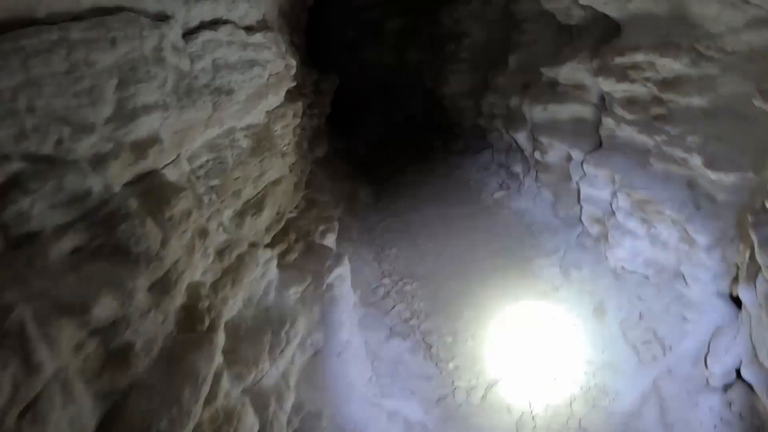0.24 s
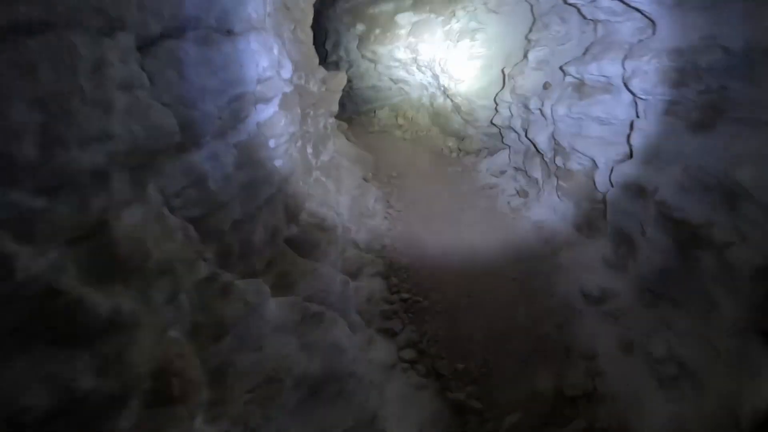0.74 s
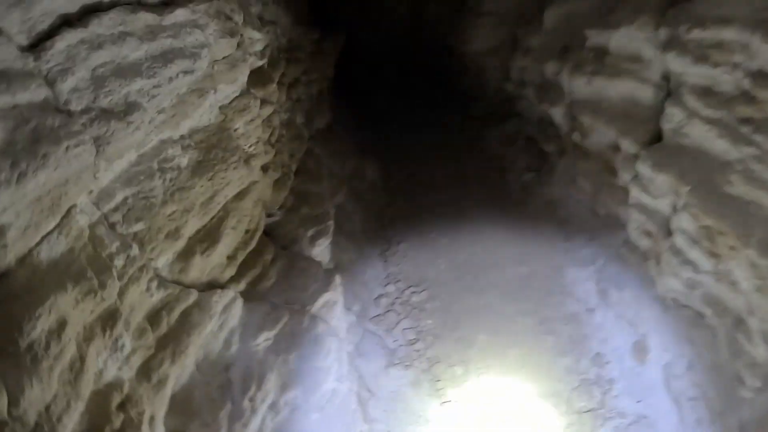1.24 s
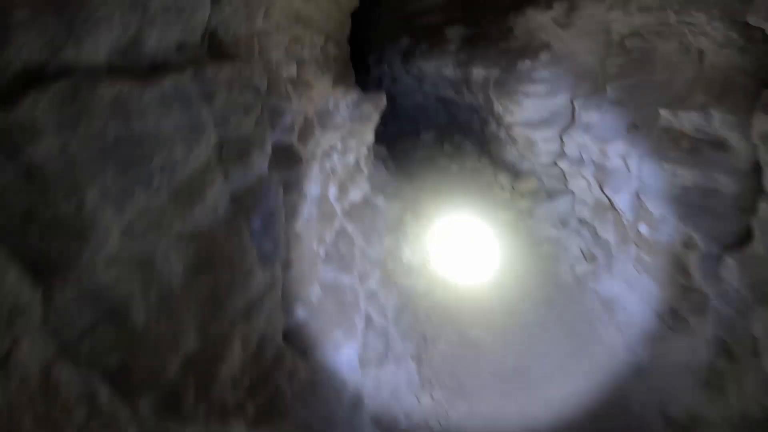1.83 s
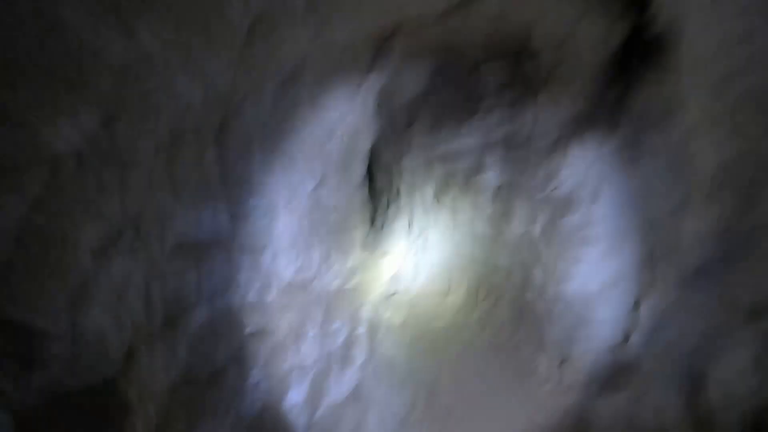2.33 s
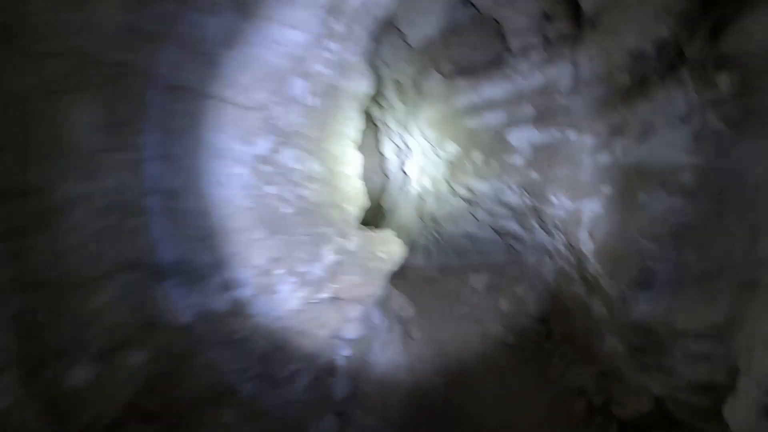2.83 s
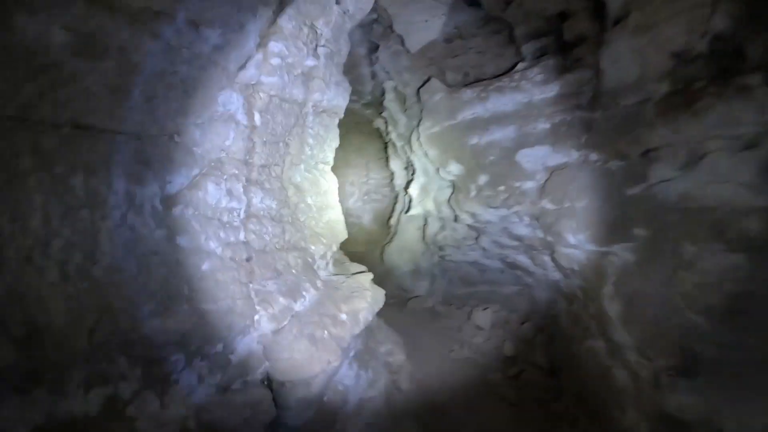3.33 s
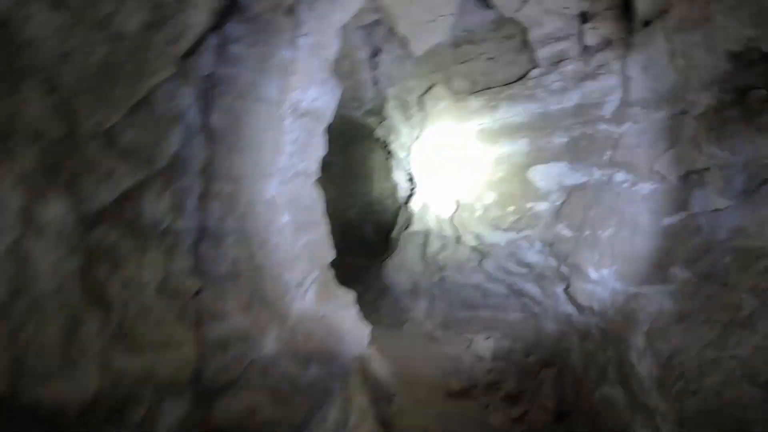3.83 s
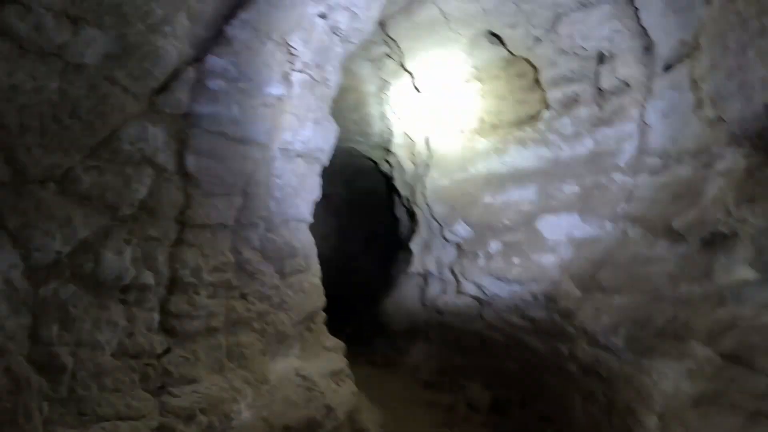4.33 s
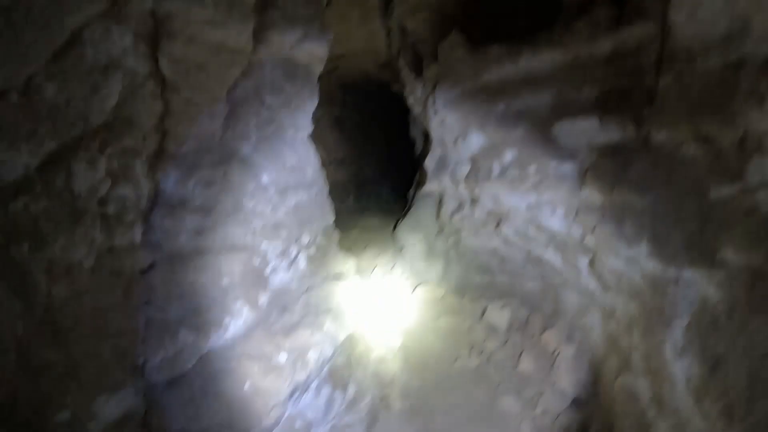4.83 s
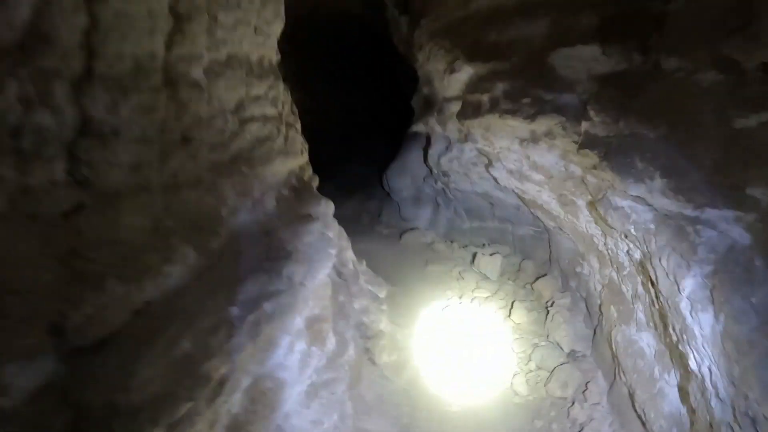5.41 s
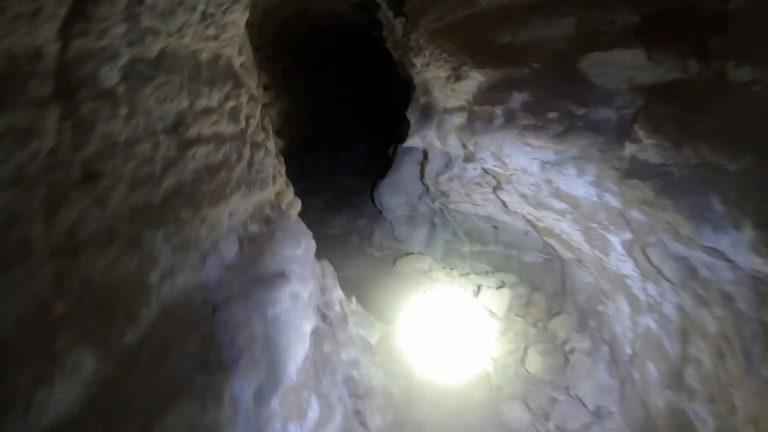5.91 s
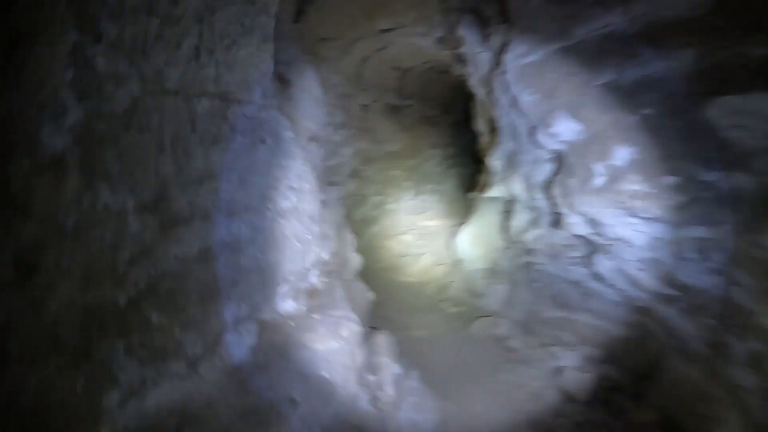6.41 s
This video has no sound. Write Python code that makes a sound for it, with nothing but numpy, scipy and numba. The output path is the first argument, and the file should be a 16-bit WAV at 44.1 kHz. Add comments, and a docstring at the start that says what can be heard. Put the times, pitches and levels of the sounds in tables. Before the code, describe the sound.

A faint steady hiss and unsteady low rumble lie under boots moving over loose stones in a cave passage, heard from a carried stereo microphone. A sharp stone crack with crunching gravel comes within 0.1 s. Short crunches and knocks follow near 0.65, 0.9 and 1.06 s, with softer scuffs around 1.5 to 1.7 s. After a light handling bump at 2.1 s, the heaviest treads hit from 2.3 to 2.7 s: stones crack and clatter, bright chips tick, dull thumps knock the microphone, and the passage booms in low, hollow notes. A strong gritty scuff comes at 3.1 s, with pebbles shifting until 3.4 s. Smaller knocks follow at 3.8 and 4.4 s, the latter with a thump, and a soft bump at 4.8 s. Sparse, lighter crunches return around 5.0, 5.7 and 6.3 to 6.5 s, with small ticks. The walls give a short, dull echo.

```python
"""A faint hiss, a low rumble and quiet crunches open the scene; boots step over loose stones in a rock passage.
A sharp crack comes within 0.1 s and crunches follow until 1.7 s, heard by a camera carried along.
From 2.1 to 2.7 s the steps are heaviest: stones crack, chips tick, bumps thump and the passage booms.
A strong scuff follows at 3.1 s, then mostly lighter steps until 6.5 s. Each knock, crack, chip, bump and boom
is made of fading rings; hiss and rumble are filtered noise, and the walls answer the stones with a short echo."""
import sys
import numpy as np
from scipy import signal
from scipy.fft import rfft, irfft, next_fast_len
from scipy.io import wavfile
from scipy.ndimage import uniform_filter1d
from numba import njit

SR = 44100
rng = np.random.default_rng(int(sys.argv[2]) if len(sys.argv) > 2 else 0)


def put_to_file(sound):
    """Save the sound as 16-bit audio at rate SR, in the file named by the first command-line argument."""
    columns = np.atleast_2d(sound).T  # one column per channel
    safe = np.clip(columns, -1, 1)
    whole_steps = np.round(safe * 32767)
    wavfile.write(sys.argv[1], SR, whole_steps.astype(np.int16))


N = 294147
SIDES = np.array([[1], [-1]])  # left, right


def undb(db):
    """Turn decibels into a plain loudness factor."""
    return 10 ** (np.asarray(db) / 20)


def unit(x):
    """Scale a sound to an average (RMS) level of 1."""
    return x / np.sqrt(np.mean(x ** 2))


def colour(x, points):
    """Make some pitches louder and others softer, along a curve of (f/Hz, level/dB) points."""
    hz, db = np.transpose(points)
    size = next_fast_len(N)
    bin_hz = np.arange(size // 2 + 1) * SR / size
    # the + 1 avoids the logarithm of zero
    gain = undb(np.interp(np.log(bin_hz + 1), np.log(hz), db))
    return irfft(rfft(x, size) * gain, size)[..., :N]


@njit
def knocks(length, start, pole, size):
    """Add up fading rings, each starting at its own sample."""
    out = np.zeros(length)
    for k in range(len(start)):
        z, i = 1 + 0j, start[k]
        # a ring stops once it has faded by 60 dB
        while abs(z) > 1e-3 and i < length:
            out[i] += size[k] * z.imag
            z *= pole[k]
            i += 1
    return out


def ring(s, hz, t60, size):
    """Struck things ring: a sine starts at each time s and fades by 60 dB in t60 seconds."""
    turn = 2j * np.pi * np.clip(hz, 20, SR / 2.2) / SR
    fade = np.log(1000) / (np.maximum(t60, 1e-4) * SR)
    return knocks(N, (s * SR).astype(np.int64), np.exp(turn - fade), size)


def walk(rate):
    """Wander at random: about `rate` new values a second, smoothed; spread near 1."""
    k = int(SR / rate)
    steps = np.repeat(rng.standard_normal(N // k + 1), k)
    return 1.3 * uniform_filter1d(uniform_filter1d(steps, k), k)[:N]


# tone of the hiss, only the shape counts: (f/Hz, level/dB)
HISS_TONE = [(59, -36), (100, -6), (257, 1), (375, -7), (831, -14), (1090, -6), (1290, -5), (1660, -12),
             (2230, -16), (3610, -21), (4350, -20), (7510, -23), (9860, -33), (11200, -40), (15000, -49)]


def hiss():
    """A faint hiss whose level wanders a little: coloured noise, partly different left and right."""
    mid, side = colour(rng.standard_normal((2, N)), HISS_TONE)
    level_db = -69.5 + 1.5 * walk(3)
    return unit(mid + .5 * side * SIDES) * undb(level_db)


# how loud the rumble is over time: (t/s, level/dB)
RUMBLE_LEVEL = [(0.0, -45.5), (0.28, -37), (0.41, -50), (0.67, -36.5), (0.82, -47.5), (0.98, -38.5),
                (1.1, -44), (1.7, -48), (1.84, -38), (2.07, -39.5), (2.17, -27), (2.24, -34.5), (2.43, -25),
                (2.7, -31.5), (3.1, -47), (3.3, -39), (3.7, -48.5), (4.03, -38), (4.14, -51), (4.4, -45),
                (4.46, -30), (4.53, -48.5), (4.77, -39.5), (5.05, -47.5), (5.7, -42.5), (6.67, -44)]


def rumble():
    """Air and handling move the microphones' skins slowly, almost alike left and right."""
    low = signal.butter(5, 51.9, fs=SR, output="sos")  # keeps what lies below 51.9 Hz
    tone = [(6, -12.5), (18, 7.5), (30, -6.5), (45, -7.0), (70, -9.5)]  # (f/Hz, level/dB)
    mid, side = signal.sosfilt(low, colour(rng.standard_normal((2, N)), tone))
    s, db = np.transpose(RUMBLE_LEVEL)
    level_db = np.interp(np.arange(N) / SR, s, db)
    return unit(mid + .24 * side * SIDES) * undb(level_db)


# the two low notes of the passage: (f/Hz, time to fade by 60 dB/s)
PASSAGE_NOTES = [(118, 0.8), (164, 0.6)]
# blows that set them ringing, levels before the band filter:
# (t/s, low note level/dB, upper note against it/dB)
BOOM_BLOWS = [(0.084, -58, 14), (0.699, -47, 2), (1.525, -67, 20), (1.816, -63, 11), (2.297, -27.5, 0),
              (2.348, -26, 8), (2.399, -19.5, -11), (2.625, -30, -3.5), (3.171, -45, -20),
              (3.789, -48.5, 2), (4.443, -61, -3), (6.389, -66, 14.5)]


def booms():
    """Heavy blows set the air of the passage ringing in two low notes, which build up slowly."""
    s, low_db, upper_db = np.transpose(BOOM_BLOWS)
    air = 0
    for (hz, t60), db in zip(PASSAGE_NOTES, (low_db, low_db + upper_db)):
        air = air + ring(s, hz + 0 * s, t60 + 0 * s, undb(db))
    # the band filter, 95 to 200 Hz, softens the start of each ring
    return signal.sosfilt(signal.butter(2, [95, 200], "band", fs=SR, output="sos"), air)


# bumps on the camera, levels before fading and smoothing:
# (t/s, level/dB, push length/s, tick against the push/dB)
CAMERA_BUMPS = [(0.086, -44.5, 0.0104, 27.5), (0.63, -30.5, 0.0064, -15), (0.897, -33, 0.0062, -0.5),
                (1.244, -41, 0.0039, -3), (2.131, -30, 0.0041, -13), (2.165, -20, 0.003, -16),
                (2.238, -25, 0.01, -3), (2.301, -12.5, 0.0076, -17), (2.346, -22, 0.012, -6),
                (2.382, -14, 0.011, -17.5), (2.399, -13, 0.0097, -6), (2.436, -15, 0.011, -12),
                (2.494, -10.5, 0.009, -23.5), (2.541, -23, 0.009, -8), (2.624, -23.5, 0.0073, 5),
                (3.124, -49, 0.01, 5), (3.164, -30.5, 0.015, 6), (3.783, -32.5, 0.013, 1),
                (4.405, -44, 0.012, -7), (4.447, -21, 0.0047, -9), (4.768, -29.5, 0.011, -32),
                (4.789, -36, 0.009, -27)]


def bumps():
    """A soft push on the camera body is a low, short ring; its shell adds a short tick."""
    s, db, push, tick_db = np.transpose(CAMERA_BUMPS)
    # one push is half a swing
    body = ring(s, 1 / (2 * np.maximum(push, .002)), 6.3 * push, undb(db))
    tick = ring(s, 420 + 0 * s, 0.0056 + 0 * s, undb(db + tick_db))
    return body + uniform_filter1d(tick, size=24)


def walls(x):
    """Rough rock scatters the sound into a short, duller tail, its treble different at each ear."""
    t60_s, echo_db, dull_hz = 0.31, -12.5, 3640
    t = np.arange(SR // 2) / SR
    fade = np.exp(-np.log(1000) * t / t60_s) * (t > .004)  # silent for the first 4 ms
    mid, side = rng.standard_normal((2, len(t))) * fade
    side = signal.sosfilt(signal.butter(1, 900, "high", fs=SR, output="sos"), side)
    both = mid + 0.61 * side * SIDES
    tail = signal.sosfilt(signal.butter(1, dull_hz, fs=SR, output="sos"), both)
    tail = tail / np.sqrt(np.sum(tail ** 2) / 2)
    return undb(echo_db) * signal.fftconvolve(x, tail, axes=1)[:, :N]


# small bright chips flying off, levels before a common cut of 5 dB:
# (t/s, level/dB, f/Hz, left minus right/dB, time to fade by 60 dB/s)
FLYING_CHIPS = [(0.6557, -40, 3970, 0.5, 0.007), (0.8969, -54, 3360, 4, 0.0064),
                (1.5569, -52, 3570, -2, 0.007), (1.699, -51, 5120, 0.5, 0.007),
                (2.131, -37.5, 3360, 0.5, 0.0049), (2.2634, -46, 3380, -1, 0.007),
                (2.4402, -31.5, 3950, 2, 0.007), (2.4996, -40, 5230, 1, 0.014),
                (2.5174, -42, 5200, 1.0, 0.007), (2.5444, -42, 5200, 0.0, 0.011),
                (2.7594, -33.5, 3400, 3, 0.0052), (3.1802, -31, 3480, 2, 0.0072),
                (3.3366, -35.5, 3780, 4, 0.0088), (4.958, -55, 4010, -2, 0.0076),
                (5.0055, -54, 4350, 1.5, 0.007), (6.3093, -48, 4070, 0.0, 0.0088),
                (6.4206, -40.5, 3970, 2.5, 0.0077), (6.5335, -38, 3550, 2, 0.0074)]


def chips():
    """A splinter of rock ticks once: one bright note that dies at once."""
    s, db, hz, pan_db, t60 = np.transpose(FLYING_CHIPS)
    return np.array([ring(s, hz, t60, undb(db + side * pan_db / 2 - 5.0)) for side in (1, -1)])


# single stones cracking, levels of the main note before a common cut of 4.5 dB and smoothing:
# (t/s, level/dB, f/Hz, left minus right/dB, time to fade by 60 dB/s)
STONE_CRACKS = [(0.035, -47, 1183, -1, 0.017), (0.042, -37.5, 1234, 0.5, 0.044),
                (0.084, -23, 1000, 0.5, 0.015), (0.11, -34, 1135, -3, 0.03), (0.618, -50, 501, -3.0, 0.011),
                (0.634, -40, 1600, -6, 0.038), (0.675, -34, 998, -0.5, 0.087),
                (0.899, -40.5, 1030, -15, 0.01), (0.942, -55, 1360, 0, 0.03),
                (1.061, -40.5, 970, 2.0, 0.036), (1.554, -51, 940, 0.5, 0.034),
                (1.639, -38.5, 1440, 2, 0.023), (1.651, -42, 1420, 2.5, 0.047),
                (2.133, -39.5, 681, -19, 0.0086), (2.161, -38, 495, -20, 0.012),
                (2.302, -24, 1243, 4, 0.036), (2.348, -18, 580, 0.5, 0.076), (2.397, -22.5, 846, -3, 0.03),
                (2.537, -40, 770, -11, 0.03), (2.621, -28, 900, 3, 0.021), (2.63, -18.5, 500, 1.0, 0.044),
                (2.953, -54, 1150, 2.0, 0.047), (3.129, -34, 1060, 6, 0.11), (3.178, -37, 1160, -7, 0.029),
                (3.284, -49, 1210, 2.5, 0.033), (3.337, -39.5, 1390, 4, 0.035),
                (3.786, -36.5, 1010, 5, 0.024), (4.325, -48, 950, 5, 0.033), (4.339, -46.5, 1380, 0, 0.035),
                (4.4, -35.5, 1000, 4, 0.025), (4.769, -55, 1240, 0.5, 0.038), (4.992, -51.5, 1390, 3, 0.03),
                (5.104, -53, 1360, 0.5, 0.028), (5.684, -44, 1230, -4, 0.03), (5.706, -39, 1476, -6, 0.036),
                (5.828, -44, 1040, 4, 0.024), (6.341, -47, 1655, -5, 0.039), (6.377, -42, 1190, -8, 0.03),
                (6.396, -49, 1430, 2.0, 0.03)]


def cracks():
    """A stone snaps: a short ring with two higher, shorter notes."""
    s, db, hz, pan_db, t60 = np.transpose(STONE_CRACKS)
    sides = []
    for side in (1, -1):
        size = undb(db + side * pan_db / 2 - 4.5)
        main = ring(s, hz, t60, size)
        second = ring(s, 2.0 * hz, .5 * t60, 0.34 * size)
        third = ring(s, 2.5 * hz, 0.4 * t60, 0.36 * size)
        sides.append(main + second + third)
    return uniform_filter1d(np.array(sides), size=4)


# each time a boot lands, shifts or drags, levels before the trim of each stone size:
# (t/s, swell/s, hold/s, basic fade/dB per s, gravel level/dB,
#  then against gravel: lumps/dB, pebbles/dB, grit/dB, sand/dB)
BOOT_TREADS = [(0.0, .03, .01, 300, -56.5, -4, -3, -9, -10),
               (0.035, 0.0073, 0.047, 194, -45, -1, -2.5, -7.5, -19),
               (0.093, .015, 0.0095, 196, -44.5, 2.5, 2, -12, -15.5),
               (0.177, 0.021, .03, 103, -64, -1.5, 0, -3, -4),
               (0.46, .04, 0.17, 200, -82, 12.5, 3, -8, 1.5),
               (0.636, .003, 0.027, 300, -44, -20, -13, -6, -9.5),
               (0.658, 0.02, 0.0052, 305, -36, -20, -4.5, -7, -25),
               (0.78, .03, 0.1, 200, -69, -5, -2, -16, -10),
               (0.894, .005, .002, 1200, -58.5, 8, 1.5, -15, -25),
               (0.92, 0.037, 0.19, 300, -63.5, -8, -20, -5, -10.5),
               (1.056, 0.0077, 0.0047, 326, -42, -28, -0.5, -11.5, -31),
               (1.109, 0.017, 0.011, 298, -57.5, -11, 2, -8, -12.5),
               (1.155, 0.057, 0.055, 295, -67.5, 3.5, -6, -1.5, -4),
               (1.5, 0.067, 0.075, 200, -57.5, -10.5, -20, -11, -13),
               (1.636, .001, .012, 338, -43, -40, -40, -40, -40),
               (1.685, 0.066, 0.067, 123, -56.5, -9, -19, -1, -7),
               (1.853, 0.028, 0.21, 200, -68.5, -1, -3.5, -1, 0.5),
               (2.066, 0.03, 0.023, 202, -66, -1, -5, -5, -7),
               (2.124, 0.0042, 0.15, 801, -59.5, 6, 0, -0.5, -4),
               (2.297, 0.0039, .004, 224, -29.5, -4.5, -1, -13.5, -25.5),
               (2.341, .005, 0.0085, 150, -41, 8.5, 12.5, -8.5, -18),
               (2.393, .004, 0.0037, 139, -41, 5, 8, -5.5, -25),
               (2.481, 0.013, 0.017, 112, -54.5, 12.5, -4, -5, -8),
               (2.594, 0.011, .02, 299, -50, 3, -8, -8.5, -22),
               (2.619, .004, 0.034, 300, -33.5, -7, 1, -4, -32),
               (2.651, 0.011, 0.0037, 360, -30.5, -6, -1.5, -15, -30),
               (2.701, 0.016, 0.0086, 169, -45.5, 1, 4, -10, -19),
               (2.84, 0.038, 0.19, 198, -65.5, -1, -4, -8.5, -8),
               (3.119, 0.0097, 0.046, 900, -34, -24, -10, -13.5, -27),
               (3.185, 0.01, .004, 400, -45.5, -5.5, -2.5, -20, -21),
               (3.252, 0.059, 0.018, 300, -53.5, -7, 1, -7.5, -14),
               (3.328, .014, .005, 254, -51.5, -8, -8, -2.5, -28),
               (3.387, .02, .02, 240, -66, -5, -10, -18, -10),
               (3.783, .002, 0.049, 247, -53, 6.5, 7, -4, -16.5),
               (3.867, 0.031, 0.1, 245, -64, -3.5, -8, -7, -12),
               (4.335, .003, 0.038, 400, -59, 3, -5, -3.5, -26),
               (4.396, 0.0057, .004, 330, -47.5, -4.5, 2, -9.5, -30),
               (4.427, 0.011, 0.0066, 304, -66, 11.5, 14, -13, -24),
               (4.763, 0.0044, .004, 350, -62.5, 7, -4, -29, -34),
               (4.956, .001, .005, 300, -69, -7, -10, -1.5, 0),
               (4.97, .01, .02, 200, -67.5, -3, -14, -9, -16),
               (5.004, 0.017, .01, 140, -61, -14, -15, -7.5, -16),
               (5.09, 0.011, .005, 117, -60, -3.5, -12, -10, -17.5),
               (5.225, .02, 0.044, 29, -64, 0.5, -4, -28, -14.5),
               (5.55, 0.11, 0.022, 197, -68.5, -0.5, 0, -7, -11),
               (5.678, .004, 0.0094, 294, -51, -15, 4, -8, -24),
               (5.699, .009, .008, 159, -46.5, -11, -2, -8, -20.5),
               (5.793, 0.044, .01, 115, -52, -8.5, -7, -11, -19),
               (5.94, 0.041, 0.32, 299, -69.5, -7, -18, -3, -4.5),
               (6.307, .001, 0.0092, 300, -53.5, -34, -15, -8, -12),
               (6.32, .01, 0.038, 300, -55.5, -28, -18, -6, -17),
               (6.371, 0.019, .005, 106, -48, -30, -3, -8.5, -19.5),
               (6.458, 0.055, 0.02, 157, -59, -20, -19, 3, -9.5)]
# how fast each stone size settles: (share of the basic fade), for gravel, lumps, pebbles, grit, sand
SETTLING = [1.0, 0.89, 1.0, 0.96, 0.71]


def load(k):
    """How hard the boot presses stones of size k: every tread swells, holds and fades."""
    t = np.arange(0, N + 32, 32) / SR  # one point every 32 samples is enough
    power = 0
    for s, swell, hold, fade, db, *sizes_db in BOOT_TREADS:
        swell = max(swell, .001)
        peak_db = db + ([0] + sizes_db)[k]
        # a swell starts 9 dB below its peak
        rise_db = -9 * np.clip(1 - (t - s) / swell, 0, 1)
        late = np.maximum(t - s - swell - max(hold, 0), 0)
        press = (t >= s) * undb(peak_db + rise_db - fade * SETTLING[k] * late)
        power = power + press ** 2
    return np.interp(np.arange(N) / SR, t, np.sqrt(power))


# one row each for gravel, lumps, pebbles, grit, sand:
# (middle f/Hz, pitch spread/octaves, half the swings in a 60 dB fade/cycles, knocks/per s,
#  size scatter/dB, trim/dB, spread of the lift on one side and cut on the other/dB)
STONE_SIZES = [(1407, 0.34, 4.35, 2200, 2, -4, 3), (287.6, 0.29, 3.6, 500, 3, 5, 2),
               (644, 0.45, 1.97, 1200, 2.0, -0.5, 2.0), (2950, 0.43, 1.9, 9000, 2.5, -1.5, 4),
               (6700, 0.34, 3.2, 18000, 2.5, -1, 2)]


def gravel():
    """Each stone size is a dense rain of short knocks, made louder as the boot presses."""
    out = 0
    for k, (hz, octaves, cycles, rate, scatter_db, trim_db, spread_db) in enumerate(STONE_SIZES):
        count = int(rate * N / SR)
        pitch = hz * 2 ** (octaves * rng.standard_normal(count))
        # many small knocks, a few large ones, pushing either way
        size_db = scatter_db * np.minimum(rng.exponential(size=count), 5)
        size = undb(size_db) * rng.choice([-1, 1], count)
        s = rng.random(count) * N / SR
        pan_db = spread_db * rng.standard_normal(count)
        t60 = 2 * cycles / pitch
        rain = np.array([ring(s, pitch, t60, size * undb(side * pan_db)) for side in (1, -1)])
        # bigger stones meet with a longer, softer contact
        contact = int(SR / hz / 5)
        rain = unit(uniform_filter1d(uniform_filter1d(rain, size=contact), size=contact))
        # a small stone gives off little sound below its own pitch
        rain = signal.sosfilt(signal.butter(2, 0.5 * hz, "high", fs=SR, output="sos"), rain)
        # stones shift in small slips, so the load is uneven
        out = out + rain * load(k) * undb(trim_db + 1.0 * walk(60))
    return out


def scene():
    """Stones and their echo from the walls, with bumps, booms and rumble."""
    stones = gravel() + cracks() + chips()
    return stones + walls(stones) + bumps() + booms() + rumble()


# tone of the microphones: (f/Hz, level/dB)
MICROPHONE_TONE = [(60, -5), (500, -2.5), (850, 0), (1200, 4), (1800, 4), (3000, 5.5), (5000, 4.5),
                   (7500, 3), (8500, 0), (11000, -5), (15000, -12.5)]
# how the two microphones differ: (f/Hz, left minus right/dB)
LEFT_MINUS_RIGHT = [(60, -1), (110, -0.5), (200, -3), (380, -1), (700, -1.5), (1290, 1.5), (2380, 2),
                    (4400, 0.5), (8120, 1.5), (15000, 10.5)]


def record(dry):
    """The microphones colour the sound, add hiss and differ a little; the top is cut at 15300 Hz."""
    heard = []
    for x, side in zip(colour(dry, MICROPHONE_TONE) + hiss(), (1, -1)):
        heard.append(colour(x, [(hz, side * db / 2) for hz, db in LEFT_MINUS_RIGHT]))
    return signal.sosfilt(signal.ellip(8, .2, 70, 15300, fs=SR, output="sos"), heard)


dry = scene()
out = record(dry)
put_to_file(out)
```